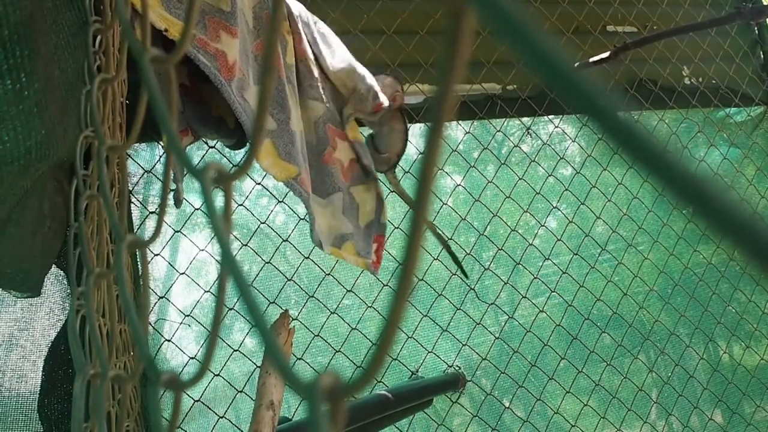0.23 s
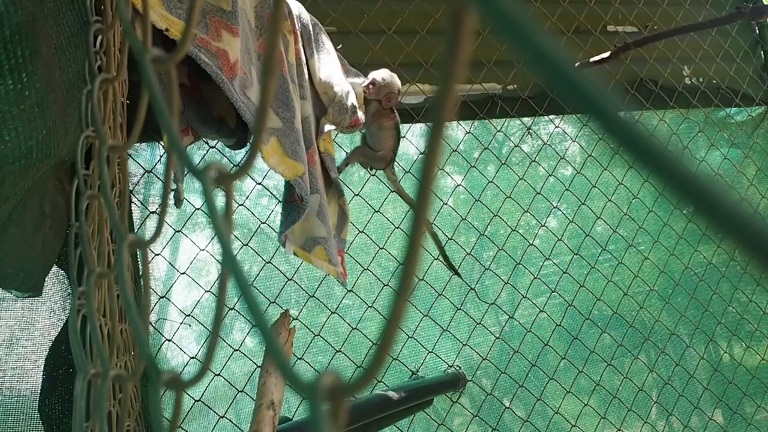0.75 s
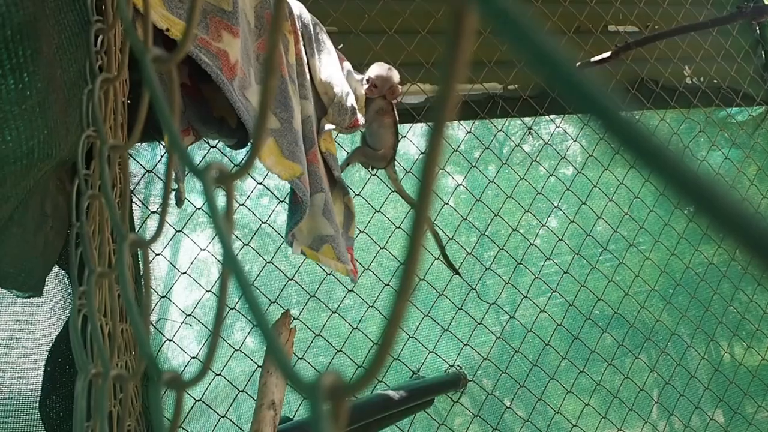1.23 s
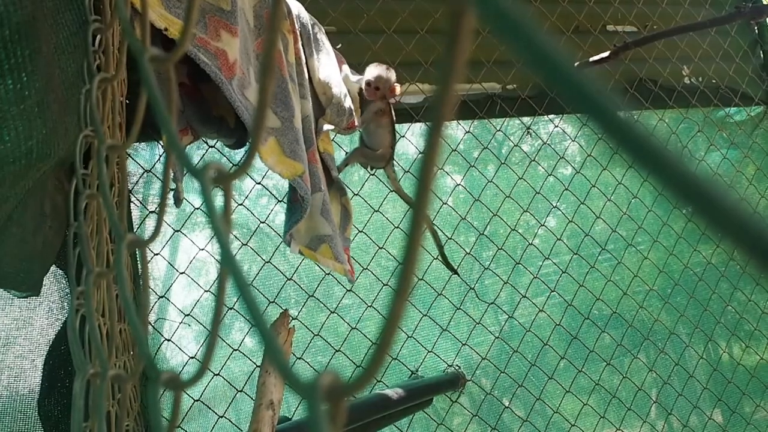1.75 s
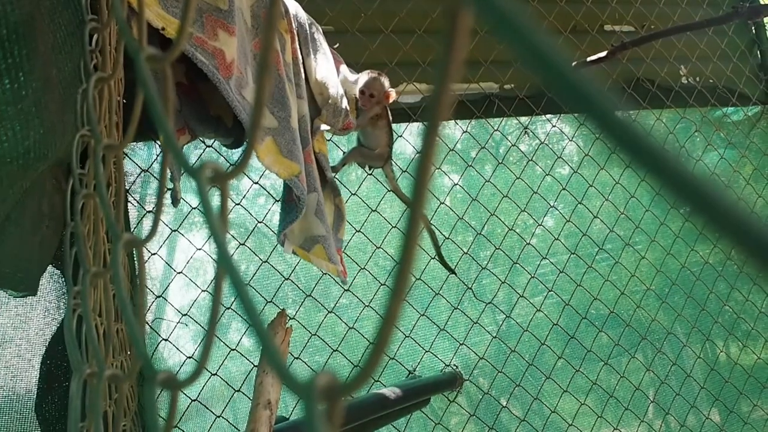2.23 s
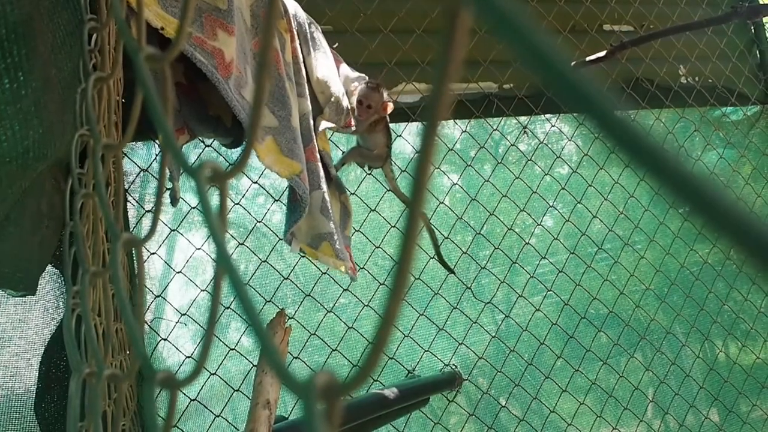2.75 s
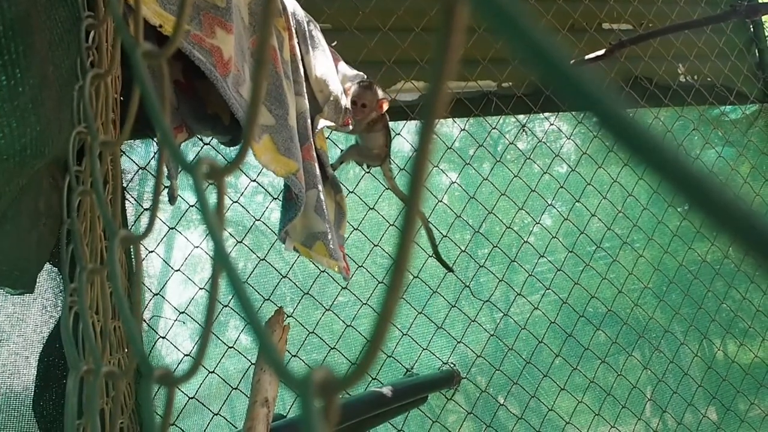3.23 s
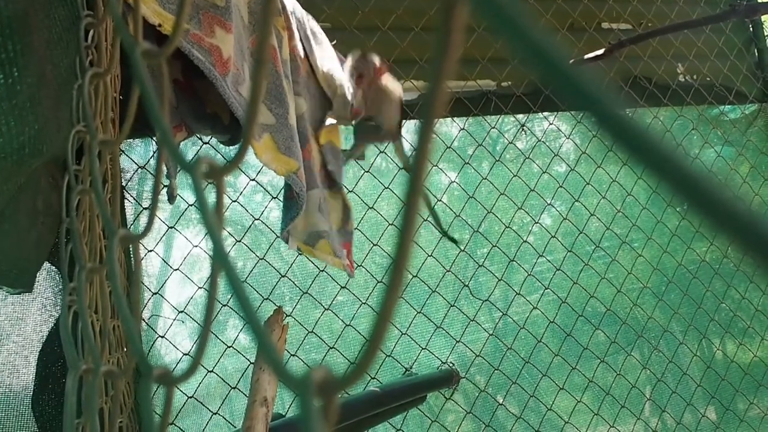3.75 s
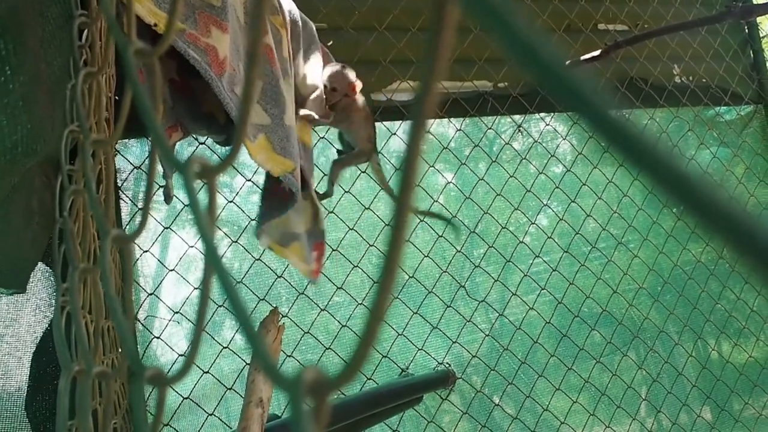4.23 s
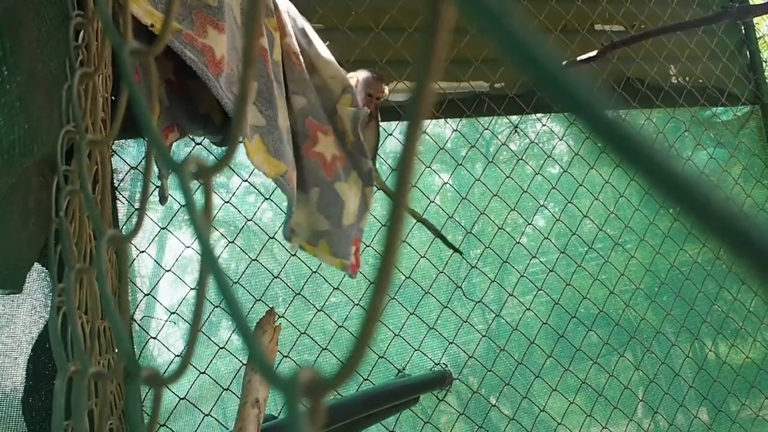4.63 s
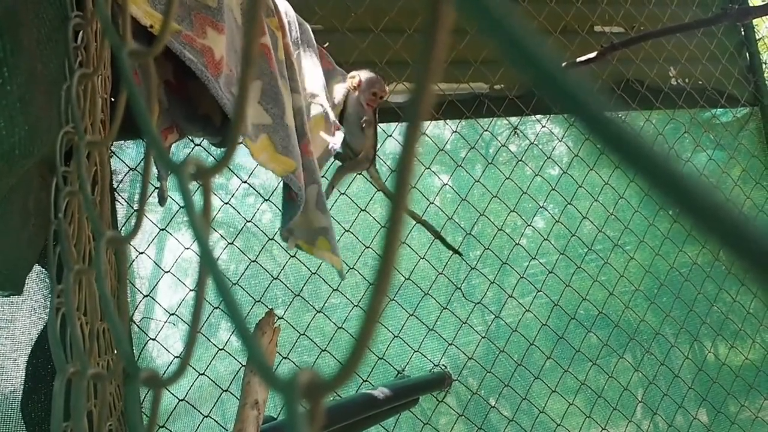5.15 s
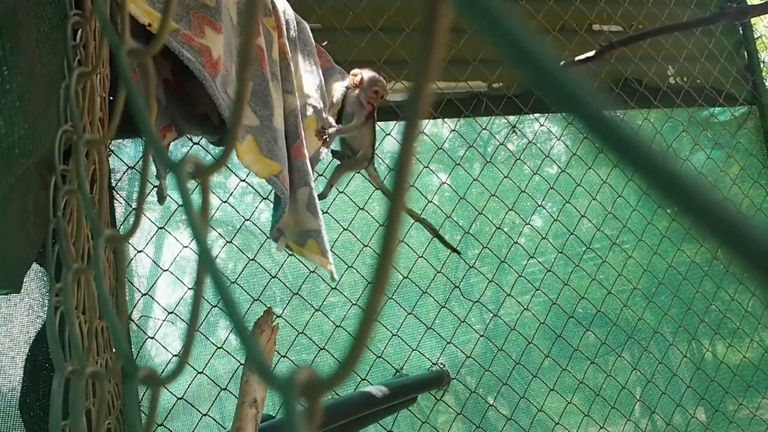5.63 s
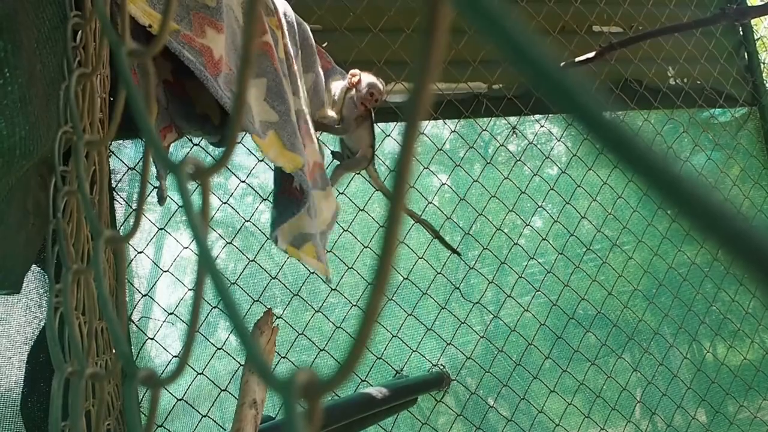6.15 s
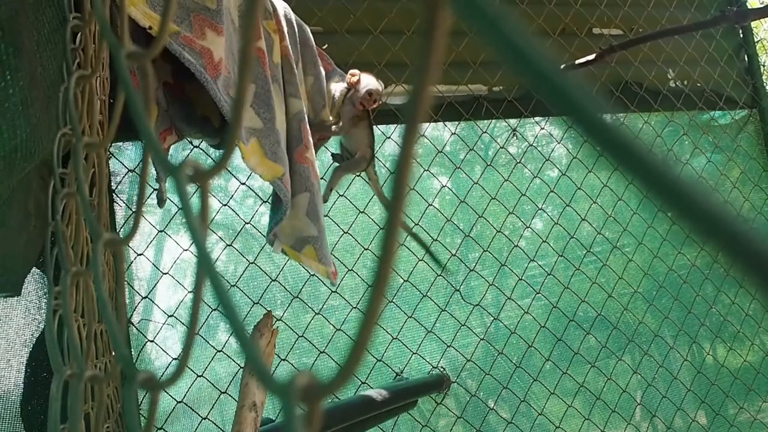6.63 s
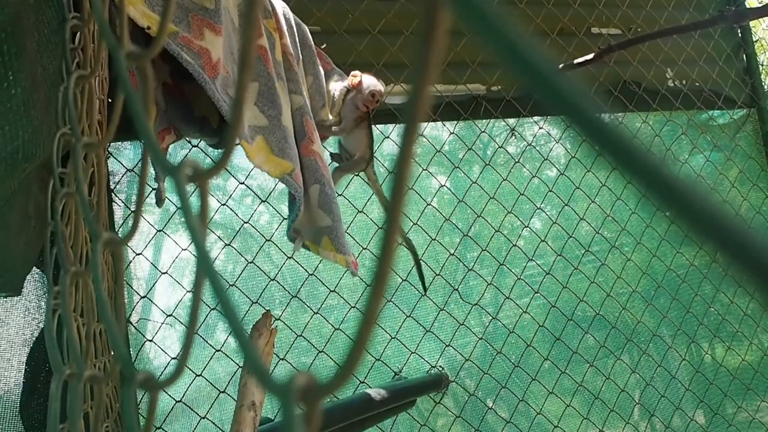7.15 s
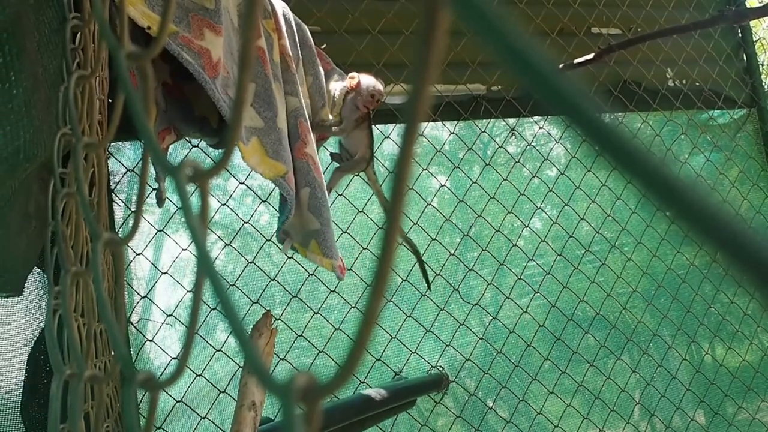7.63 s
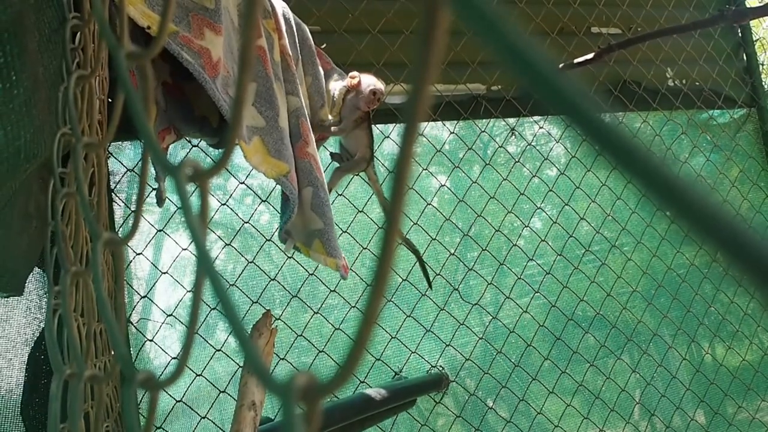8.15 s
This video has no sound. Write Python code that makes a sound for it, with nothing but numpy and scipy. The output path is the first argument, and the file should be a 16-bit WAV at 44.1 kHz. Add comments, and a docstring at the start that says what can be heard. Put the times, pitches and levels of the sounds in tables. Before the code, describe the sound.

A faint outdoor wash and high hiss run throughout, and the enclosure adds a short echo. Right at the start an infant monkey, ahead and slightly left, gives a quick cluster of thin, high chirps. Soft, short grunts and light ticks follow, with a clearer tick near 1.8 seconds. From about 3 seconds, sharp taps on something hollow sound irregularly, close on the right, about ten in all, the last near 8 seconds. A stronger grunt comes at 3.8 seconds, then raspy chirps until 4.3, with faint brushes of a blanket. Two long, loud, rising squeals, slipping between clean and hoarse, last from 4.8 to 5.7 and from 5.9 to 6.6 seconds. Three lower, buzzy wails follow between 7.1 and 7.7 seconds. They fall into grunts and, from 7.9 seconds, a rapid, low stuttering trill that continues to the end.

```python
"""An infant monkey calls in distress, clinging to a blanket in an outdoor wire enclosure.
Its vocal folds slip between a clean tone and a hoarse rasp, and its mouth shapes the sound into thin
chirps, soft grunts, two long rising squeals, then wails that break down into a stuttering trill.
Sharp taps ring something hollow close by on the right. Light ticks and brushes of cloth sit over
a faint outdoor wash and a high hiss, and the roof and walls add a short echo."""
import sys
import numpy as np
from scipy import signal
from scipy.fft import rfft, irfft
from scipy.io import wavfile
from scipy.ndimage import uniform_filter1d

SR = 44100
rng = np.random.default_rng(int(sys.argv[2]) if len(sys.argv) > 2 else 0)


def to_wav(sig):
    """Store sig (one row per channel, or 1-D mono) as 16-bit WAV at the path in sys.argv[1].

    Samples outside -1..1 are clipped; the rate is SR.
    """
    pcm = np.clip(np.atleast_2d(sig), -1, 1) * 32767
    pcm = np.round(pcm).astype(np.int16)
    wavfile.write(sys.argv[1], SR, pcm.T)  # frames by channels


N = 369989
TOP_HZ = 16000  # overtones stop here
FULL_PUSH_DB = -28  # grunts softer than this get duller

# how the open mouth boosts or weakens each frequency: f/Hz, level/dB
OPEN_MOUTH = [(300, -55), (1200, -14), (1800, 9), (2400, 10), (3300, 1), (4800, 4.5), (5800, 7), (6900, -9),
              (8200, -15), (9700, -1), (11000, 2), (13000, -18), (15000, -23)]


def undb(db):
    """Turn decibels into a factor to multiply by."""
    return 10 ** (np.asarray(db) / 20)


def unit(x):
    """Scale a sound to an average strength (rms) of 1."""
    return x / np.sqrt(np.mean(x ** 2) + 1e-20)


def curves(table, at):
    """Look up a place in a table's first column and read the other columns there."""
    first, *columns = np.transpose(table)
    return [np.interp(at, first, column) for column in columns]


def shape(points, hz):
    """Gain at the given frequencies, read from rows of f/Hz, level/dB."""
    f, db = np.transpose(points)
    return undb(np.interp(np.log(np.maximum(hz, 1)), np.log(f), db))


def noise(size, gain):
    """Noise of strength 1, coloured by the function gain(frequency)."""
    return unit(irfft(rfft(rng.standard_normal(size)) * gain(np.fft.rfftfreq(size, 1 / SR)), size))


def wobble(size, hz):
    """A random wander of about 1 either way, no faster than about hz."""
    return noise(size + 4096, lambda f: 1 / (1 + (f / hz) ** 4))[:size]


def add(track, start, sound):
    """Mix a sound into a track from the given second on."""
    i = max(int(start * SR), 0)
    part = sound[..., :max(N - i, 0)]
    track[..., i:i + part.shape[-1]] += part


def pan(left_db):
    """Gains for the two ears, the left one louder by left_db."""
    return undb(np.array([[left_db], [-left_db]]) / 2)


def controls(table):
    """The sample times of one call, followed by its smoothed columns."""
    t = np.arange(table[0][0] - .004, table[-1][0] + .004, 1 / SR)
    return [t] + [uniform_filter1d(c, size=300, mode="nearest") for c in curves(table, t)]


def gate(t, attack_s, release_s):
    """Fade in, hold and fade out."""
    ramp = np.minimum((t - t[0]) / attack_s, (t[-1] - t) / release_s)
    return np.sin(np.pi / 2 * np.clip(ramp, 0, 1))


def background(base_db=-39, sway_db=1.4):
    """A low outdoor wash and a wide high hiss, swaying gently in level."""
    # tone colour of the wash and hiss: f/Hz, level/dB
    outline = [(18, -53), (30, -16.5), (98, -7), (239, -2.5), (280, -6.5), (473, -1), (780, -3.5),
               (988, -2), (1190, -9.5), (1860, -5.5), (2610, -9.5), (3220, -7), (6050, -12.5),
               (11400, -1.5), (16000, -5)]
    # stereo width, the ears' difference against what they share: f/Hz, level/dB
    stereo_width = [(60, -4), (110, -4.5), (200, -4), (380, -5.5), (700, -5), (1290, -6), (2380, -6),
                    (4400, -2.5), (8120, 0.5), (15000, 4.5)]
    # narrow peaks in the hiss: f/Hz, width/Hz, boost/dB
    hiss_peaks = [(9770, 114, 7), (10540, 130, 5), (11020, 160, 8), (11420, 83, 7.5), (11950, 74, 6.5),
                  (14130, 46, 2), (15080, 120, 4)]
    # the background sinks a little toward the loudest calls: t/s, level/dB
    levels = [(0, 2.6), (5.3, 2), (5.7, 1.5), (6.7, 1), (7.5, 1)]

    def colour(f):
        peaks_db = sum(db / (1 + (2 * (f - hz) / width) ** 2) for hz, width, db in hiss_peaks)
        return shape(outline, f) * undb(peaks_db)

    mid = noise(N, colour)
    side = irfft(rfft(noise(N, colour)) * shape(stereo_width, np.fft.rfftfreq(N, 1 / SR)), N)
    ears = np.array([mid + side, mid - side]) * pan(left_db=1)
    db, = curves(levels, np.arange(N) / SR)
    return ears * undb(base_db + db + sway_db * wobble(N, 6.2))


def cry(pitch, top_db, rough, mouth, tilt_db, side_db, side_hz, half_db, air_db=-2, rasp=.8):
    """One high call: vocal folds, from clean (rough=0) to chaotic (1), heard through the mouth."""
    n = len(pitch)
    # the pitch quavers slightly, and leaps about when very rough
    hz = pitch * (1 + .006 * wobble(n, 70) + (.045 * rough + .075 * rough ** 8) * wobble(n, 130))
    # cycles come early or late, which sounds hoarse
    phase = 2 * np.pi * np.cumsum(hz) / SR + rasp * rough * wobble(n, 550)
    k = np.arange(1, 11)[:, None]  # harmonic numbers
    gains = shape(mouth, k * pitch) * undb(tilt_db * np.log2(k)) * (k * pitch < TOP_HZ)
    air_share = np.clip(undb(air_db) * rough ** 1.5, 0, .48)
    # a second, weaker vibration adds a tone about side_hz above the pitch
    side_phase = 2 * np.pi * np.cumsum(side_hz * (1 + .08 * wobble(n, 100))) / SR
    out = undb(side_db) * np.sin(phase + side_phase)
    # rough cycles are strong and weak by turns, adding a blurred tone an octave down
    out += undb(half_db) * rough * wobble(n, 440) * np.sin(phase / 2)
    # tone and breath are mixed below 7 kHz, then above it, where top_db sets their level
    upper = np.clip((k * pitch - 6500) / 1000, 0, 1)
    low_cut_hz = .76 * pitch.mean()
    for share, above, gain in ((1 - upper, False, 1), (upper, True, undb(top_db))):
        band = gains * share
        tone = (band * np.sin(k * phase)).sum(0) / np.sqrt((band ** 2).sum(0) / 2 + 1e-9)
        air = noise(n, lambda f: shape(mouth, f) * ((f > 7000) == above)
                    / (1 + (low_cut_hz / (f + 1)) ** 6))
        out += gain * (np.sqrt(1 - air_share ** 2) * tone + air_share * air)
    flicker_db = 1.8 * wobble(n, 90) + 5 * np.minimum(rough, .5) * wobble(n, 330)
    return out * undb(flicker_db - 1.5 * rough)


def chirps(fade_db=-1.5):
    """Short open-mouthed glides that fade as they go; the rougher, the brighter."""
    # high calls: t/s, length/s, start pitch/Hz, end pitch/Hz, level/dB, roughness/0-1
    calls = [(.006, 0.011, 5800, 5760, -26, .3), (.016, 0.02, 5800, 5610, -19, 0.29),
             (0.036, 0.021, 5800, 5720, -19.5, 0.24), (.06, 0.034, 5920, 5580, -17, 0.15),
             (0.09, 0.019, 5330, 4900, -14, 0.19), (0.105, 0.032, 4660, 4840, -21.5, 0.34),
             (0.172, 0.022, 4850, 4570, -24, 0.6), (0.188, 0.034, 4390, 4260, -25.5, 0.3),
             (3.888, 0.054, 3530, 4400, -28, 0.41), (4.004, .058, 4140, 3280, -26, 0.43),
             (4.08, 0.07, 3620, 3160, -27, 0.44), (4.121, 0.075, 3980, 3550, -26, 0.57),
             (4.18, .076, 4220, 3670, -20.5, .97), (4.25, 0.025, 4000, 4000, -23, 0.65),
             (4.265, 0.05, 4470, 4900, -21.5, 0.6), (5.074, 0.072, 2585, 2420, -23, 0.31),
             (5.814, 0.029, 1543, 1587, -22, .42)]
    out = np.zeros(N)
    for start, length, from_hz, to_hz, db, rough in calls:
        t = np.arange(int(length * SR)) / SR
        progress = t / length
        pitch = from_hz + (to_hz - from_hz) * progress
        top_db = -21.5 + 20.5 * rough
        voice = cry(pitch, top_db, rough, OPEN_MOUTH,
                    tilt_db=-2, side_db=-28.5, side_hz=1600, half_db=-16)
        add(out, start, voice * undb(db + fade_db * progress) * gate(t, attack_s=.0059, release_s=.015))
    return out


def grunt(length, from_hz, to_hz, db, rough, arch, swell, skew, air_db=2):
    """A short low pulse of voice: the pitch arches with the push of breath, the lips colour it."""
    # how half-closed lips boost or weaken each frequency: f/Hz, level/dB
    lips = [(60, -106), (420, -15), (830, -6), (1050, -12.5), (1350, 4.5), (1660, 5), (2150, -10),
            (2550, -16), (3100, -1), (3700, -19.5), (4300, -5.5), (5600, -28), (8300, -31), (9800, -9.5),
            (13000, -42)]
    k = np.arange(1, 33)[:, None]  # harmonic numbers
    n = int(length * SR)
    progress = np.linspace(0, 1, n)
    push = np.abs(np.sin(np.pi * progress ** skew))  # swells faster than it fades
    hz = (from_hz + (to_hz - from_hz) * progress) * (1 + arch * (push - .7))
    quaver = (.006 + .08 * rough) * wobble(N // 64, 250)[:n]
    phase = 2 * np.pi * np.cumsum(hz * (1 + quaver)) / SR
    # the softer the push, the weaker its overtones
    tilt_db = .75 * min(db - FULL_PUSH_DB, 0) - 6 * (1 - push)
    gains = shape(lips, k * hz) * undb(tilt_db * np.log2(k)) * (k * hz < TOP_HZ)
    tone = unit((gains * np.sin(k * phase + rng.uniform(0, 2 * np.pi, k.shape))).sum(0))
    air = noise(N // 64, lambda f: shape(lips, f))[:n] * (1 + .5 * np.cos(phase))
    return undb(db) * push ** swell * unit(tone + undb(air_db) * rough * air)


def grunts():
    """Single pulses of voice around the cries; gliding or soft ones are rougher."""
    # grunts and faint squeaks: t/s, length/s, start pitch/Hz, end pitch/Hz, level/dB
    calls = [(0.134, 0.046, 1990, 1930, -40), (0.836, 0.023, 438, 382, -40.5),
             (1.224, .028, 450, 416, -42.5), (1.301, 0.024, 483, 466, -31.5),
             (1.315, 0.022, 446, 392, -38.5), (1.371, 0.012, 450, 410, -38),
             (1.903, 0.056, 349, 368, -34.5), (1.99, 0.024, 407, 363, -39), (2.058, 0.048, 423, 348, -39),
             (3.466, 0.031, 339, 350, -39.5), (3.511, 0.045, 376, 367, -41.5),
             (3.584, 0.028, 384, 380, -41.5), (3.759, 0.0329, 461, 560, -21),
             (3.783, 0.03, 542, 540, -30.5), (4.731, 0.051, 615, 760, -31.5),
             (4.775, .064, 629.5, 877, -27), (5.837, 0.029, 1606, 1675, -33),
             (6.594, 0.075, 2850, 2700, -41), (6.96, 0.048, 398, 390, -38.5),
             (7.039, 0.066, 433.5, 458, -26.5), (7.709, 0.065, 877, 691, -24.5),
             (7.746, .125, 545.7, 369.6, -26.5)]
    out = np.zeros(N)
    for start, length, from_hz, to_hz, db in calls:
        rough = .18 + .42 * abs(np.log2(to_hz / from_hz)) + .025 * max(FULL_PUSH_DB - db, 0)
        add(out, start, grunt(length, from_hz, to_hz, db, rough, arch=.043, swell=.76, skew=.797))
    return out


def blanket():
    """The blanket brushes softly as the monkey shifts its grip."""
    # brushes of cloth: t/s, length/s, level/dB
    brushes = [(0.758, .045, -42.5), (4.067, 0.021, -35), (4.346, 0.036, -41), (4.36, 0.12, -41.5),
               (4.599, 0.08, -43.5), (4.889, 0.041, -41)]
    colour = [(40, -12), (200, -6), (1400, -4), (5000, -6.5), (14000, -33)]  # f/Hz, level/dB
    out = np.zeros(N)
    for start, length, db in brushes:
        n = int(length * SR)
        cloth = noise(N // 64, lambda f: shape(colour, f))[:n]
        add(out, start, undb(db) * np.hanning(n) * cloth)
    return out


def ticks(ring_s=.025, width=.096):
    """Light ticks and knocks: bursts of noise that each ring around one frequency."""
    # small hits: t/s, peak level/dB, f/Hz
    hits = [(0.907, -31, 450), (1.556, -34.5, 2600), (1.635, -41, 2200), (1.815, -19.5, 2550),
            (1.88, -34, 3000), (3.206, -37, 1300), (6.802, -24.5, 1630)]
    out = np.zeros(N)
    t = np.arange(2048) / SR
    for start, db, hz in hits:
        ring = noise(len(t), lambda f: 1 / (1 + ((f - hz) / (width * hz)) ** 2))
        tick = ring * undb(-60 * t / ring_s)
        add(out, start, undb(db) * tick / np.abs(tick).max())
    return out


def taps(crack_boost_db=3, crack_s=.0083, contact_s=.00036, lag_s=.001094):
    """Each tap rings the same few tones of a hollow thing; most also carry a short, bright crackle."""
    # hits: t/s, level/dB, crackle against ring before its boost/dB, left minus right/dB
    hits = [(3.088, -20, -13, -8), (3.776, -7, -6.5, -10), (4.814, -7, -5, -11), (5.082, -4.5, -14, -9),
            (5.364, -19.5, 4, -9), (5.87, -7.5, -5, -11), (6.456, -9, -2, -10), (6.716, -4, -31, -10),
            (6.874, -21.5, -20, -9), (8.025, -8, -4, -9.5)]
    # the hollow thing's own tones: f/Hz, level/dB, time to fade by 60 dB/s
    tones = [(986, -8, 0.025), (1470, 6.5, 0.0023), (1730, -4.5, 0.016), (2640, -33.5, 0.038)]
    out = np.zeros((2, N))
    t = np.arange(4096) / SR
    crack_band = signal.butter(2, [1800, 4800], "bandpass", fs=SR, output="sos")
    bass_cut = signal.butter(2, 600, "highpass", fs=SR, output="sos")  # small things give little bass
    onset = 1 - np.exp(-(t / contact_s) ** 2)
    for start, db, crack_db, left_db in hits:
        detune = 1 + .0046 * rng.standard_normal(len(tones))
        ring = sum((-1) ** m * undb(tone_db - 60 * t / ring_s) * np.sin(2 * np.pi * hz * detune[m] * t)
                   for m, (hz, tone_db, ring_s) in enumerate(tones))
        ring = signal.sosfilt(bass_cut, ring * onset)
        crack = signal.sosfilt(crack_band, rng.standard_normal(len(t)) * undb(-60 * t / crack_s))
        tap = ring / np.abs(ring).max() + undb(crack_db + crack_boost_db) * crack / np.abs(crack).max()
        sides = pan(left_db)
        add(out, start + lag_s, tap * undb(db) * sides / sides.mean())
    return out


def squeals(throb_from_s=6.125, throb_to_s=6.457, throb_hz=18.1, throb_db=3):
    """Two long rising squeals; each sag in pitch makes the voice weaker and more chaotic."""
    # one list for each squeal: t/s, pitch/Hz, level/dB, mouth opening as treble above 7 kHz/dB
    calls = [
        [(4.835, 1309, -31.5, -24), (4.87, 1940, -25, -37), (4.945, 2682, -28, -20), (4.995, 2455, -21.5, -18),
         (5.01, 2856, -27, -15), (5.13, 3000, -29, -18), (5.145, 3206, -28.5, -19), (5.25, 3287, -24.5, -11),
         (5.333, 4030, -21, -5), (5.4, 4426, -19.5, -6), (5.46, 4640, -16.5, -7), (5.474, 4990, -15.5, 2.5),
         (5.555, 4870, -16.5, 4), (5.65, 5120, -18, 3.5), (5.666, 4870, -18, -15)],
        [(5.876, 3870, -30, -15), (5.91, 3660, -24.5, -7.5), (5.93, 4350, -24, -25), (5.972, 4600, -30.5, -8),
         (5.985, 4670, -17.5, -18), (6.045, 4780, -17.5, -14), (6.065, 5130, -17, -8), (6.12, 5074, -13, -4),
         (6.245, 5084, -17, 3.5), (6.31, 5165, -17, -1.5), (6.42, 5300, -16.5, -1), (6.47, 4910, -20.5, -1),
         (6.56, 4720, -27.5, -7), (6.594, 4895, -20, -12), (6.61, 4720, -30, -6)],
    ]
    # the voice is hoarse on the way up and clears near the top: pitch/Hz, roughness/0-1
    hoarseness = [(2600, .36), (3900, .43), (5100, .17)]
    # the pitch sags and recovers: t of the lowest point/s, length/s, pitch lost/share
    sags = [(5.36, .056, .09), (5.432, .062, .13), (5.504, .07, .155), (5.602, .1, .19), (6.205, .06, .04),
            (6.266, .07, .1), (6.372, .075, .1)]
    out = np.zeros(N)
    for call in calls:
        t, pitch, db, top_db = controls(call)
        sag = sum(lost * np.cos(np.pi * np.clip((t - at) / length, -.5, .5)) ** 2
                  for at, length, lost in sags)
        pitch = pitch * (1 - sag)
        rough = np.minimum(curves(hoarseness, pitch)[0] + 1.75 * sag, 1)
        # the treble throbs at the height of the second squeal
        throbbing = np.clip(1 + throb_hz * np.minimum(t - throb_from_s, throb_to_s - t), 0, 1)
        top_db += throb_db * throbbing * np.cos(2 * np.pi * throb_hz * (t - throb_from_s))
        voice = cry(pitch, top_db, rough, OPEN_MOUTH,
                    tilt_db=-12, side_db=-24, side_hz=1140, half_db=-17)
        add(out, t[0], voice * undb(db - 34 * sag) * gate(t, attack_s=.0044, release_s=.0054))
    return out


def wails(break_octaves_per_s=24):
    """Three lower calls, buzzier as the pitch falls and hoarse wherever it slides fast."""
    # one list for each wail: t/s, pitch/Hz, level/dB
    calls = [
        [(7.108, 1579, -26), (7.13, 2237, -26), (7.15, 2186, -29.5), (7.16, 1900, -19.5), (7.176, 2340, -29),
         (7.206, 2519, -31), (7.222, 2690, -23), (7.246, 2314, -34.5), (7.284, 2394, -29.5),
         (7.314, 2033, -19.5), (7.37, 2194, -23), (7.394, 1955, -21.5), (7.418, 1347, -28), (7.425, 1235, -32)],
        [(7.479, 1626, -29), (7.495, 1538, -21), (7.509, 1344, -24), (7.525, 1249, -31), (7.539, 1017, -30),
         (7.55, 977, -32)],
        [(7.571, 1221, -33.5), (7.599, 1240, -27.5), (7.613, 1470, -25.5), (7.621, 1603, -26.5),
         (7.653, 1538, -30.5), (7.661, 1537, -27.5), (7.681, 1346, -24.5), (7.713, 1150, -32.5),
         (7.718, 1140, -25)],
    ]
    # how the wailing mouth boosts or weakens each frequency: f/Hz, level/dB
    mouth = [(300, -45), (900, -16), (1600, 1), (2300, 3), (3100, -1.5), (3700, -6), (4500, 3),
             (5400, -7.5), (6800, -18.5), (8500, -24), (9900, -9), (11500, -8), (15000, -29)]
    # the first wail catches hoarsely before it clears: t/s, extra roughness/0-1
    catch = [(7.11, .4), (7.16, .3), (7.19, 0)]
    out = np.zeros(N)
    for call in calls:
        t, pitch, db = controls(call)
        octaves = np.log2(pitch / 1500)
        glide = uniform_filter1d(np.abs(np.gradient(octaves, t)), size=900, mode="nearest")
        rough = np.interp(glide, [0, break_octaves_per_s], [.11, .42]) + curves(catch, t)[0]
        top_db = -13 - 14 * octaves
        voice = cry(pitch, top_db, rough, mouth,
                    tilt_db=-4, side_db=-38, side_hz=450, half_db=-15, air_db=-4, rasp=.55)
        add(out, t[0], voice * undb(db) * gate(t, attack_s=.0056, release_s=.0049))
    return out


def trill(first_s=7.883, pulses_per_s=16.6, pitch_scatter=.012, pitch_drop=.035):
    """An even stutter of grunts that grow longer and cleaner."""
    # the pulses settle from short and low to full and even: t/s, length/s, pitch/Hz, level/dB
    pulses = [(7.88, 0.036, 362, -31), (7.99, 0.053, 364, -29), (8.1, .069, 412.5, -28.5),
              (8.36, 0.068, 418, -27.5)]
    # the voice goes from hoarse to nearly clean: t/s, roughness/0-1
    hoarseness = [(7.88, .36), (8.1, .13)]
    out = np.zeros(N)
    for middle in np.arange(first_s, N / SR, 1 / pulses_per_s):
        length, hz, db = curves(pulses, middle)
        rough, = curves(hoarseness, middle)
        hz *= 1 + pitch_scatter * rng.standard_normal()
        droop = hz * pitch_drop / 2
        pulse = grunt(length, hz + droop, hz - droop, db, rough, arch=.041, swell=1.1, skew=.757)
        add(out, middle - length / 2, pulse)
    return out


def enclosure(x, ring_s=.31, gap_s=.0042):
    """Scattered echoes from the roof and walls, different at each ear."""
    t = np.arange(SR * 3 // 4) / SR
    fade = undb(-60 * t / ring_s) * (t > gap_s)
    ears = []
    for _ in range(2):
        low = noise(len(t), lambda f: 1 / (1 + (f / 5500) ** 4))
        high = noise(len(t), lambda f: f / (f + 6000))
        tail = (low + undb(-2.5) * high) * fade
        ears.append(signal.fftconvolve(x, tail / np.sqrt(np.sum(tail ** 2)))[:N])
    return np.array(ears)


def scene(high_echo_db=-18, centre_echo_db=-15, tap_echo_db=-30):
    """The monkey ahead, its high calls a little left, the taps to the right, all under one roof."""
    air = background()
    high = squeals() + chirps()
    centre = wails() + grunts() + trill() + ticks() + blanket()
    knocks = taps()
    direct = high * pan(left_db=2) + centre + knocks
    sent = undb(high_echo_db) * high + undb(centre_echo_db) * centre + undb(tap_echo_db) * knocks.mean(0)
    return direct + enclosure(sent) + air


def record(dry):
    """Clip the peaks at full scale and cut the highest treble."""
    treble_cut = signal.ellip(10, .1, 80, TOP_HZ, fs=SR, output="sos")
    return signal.sosfilt(treble_cut, np.clip(dry, -1, 1))


dry = scene()
out = record(dry)
to_wav(out)
```